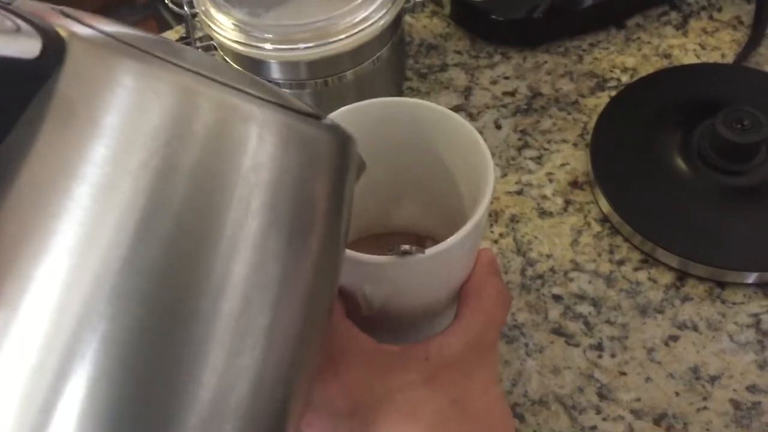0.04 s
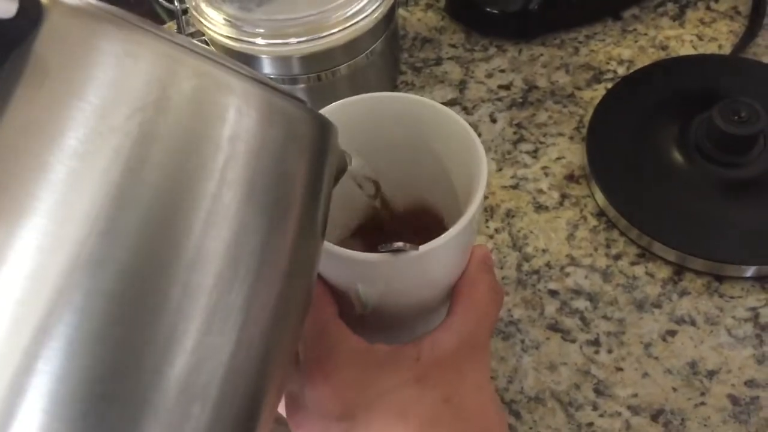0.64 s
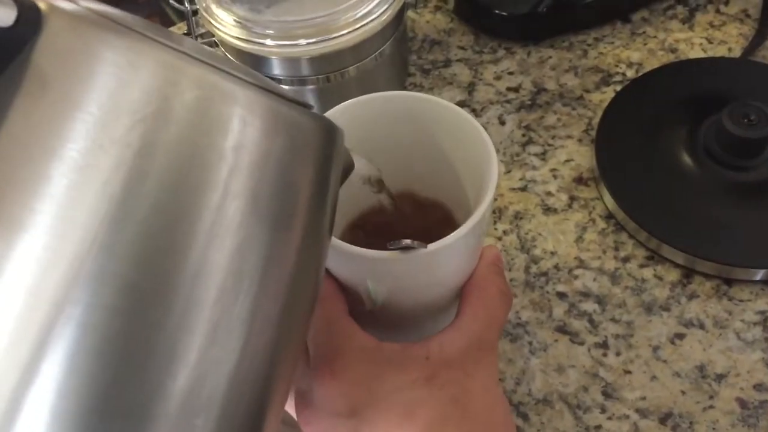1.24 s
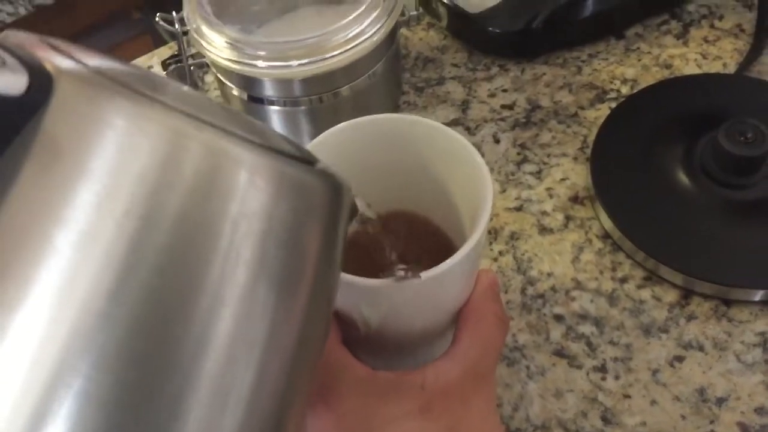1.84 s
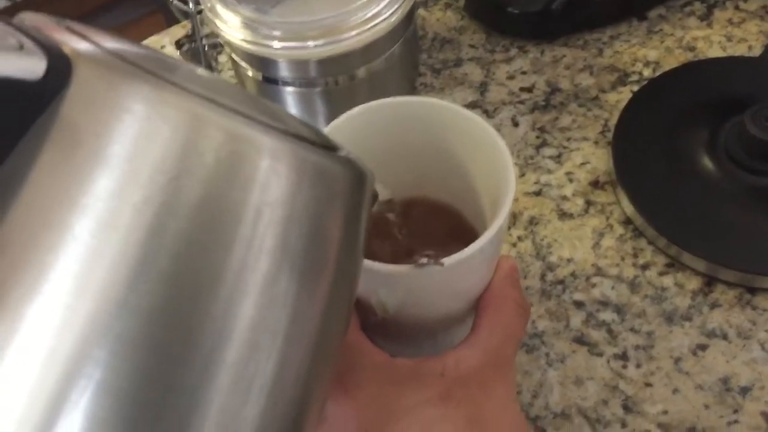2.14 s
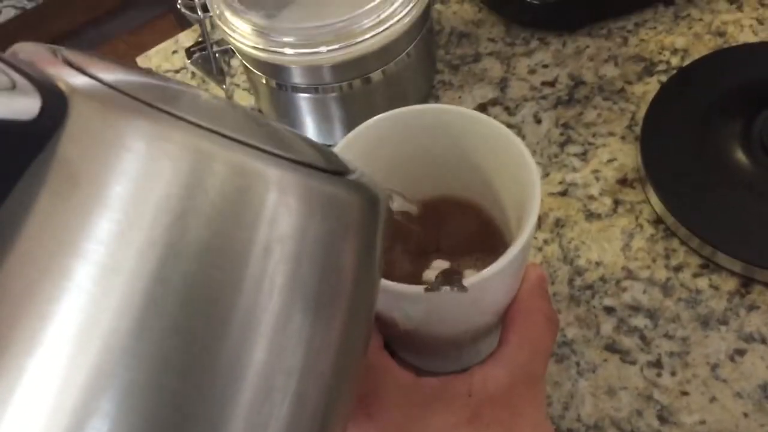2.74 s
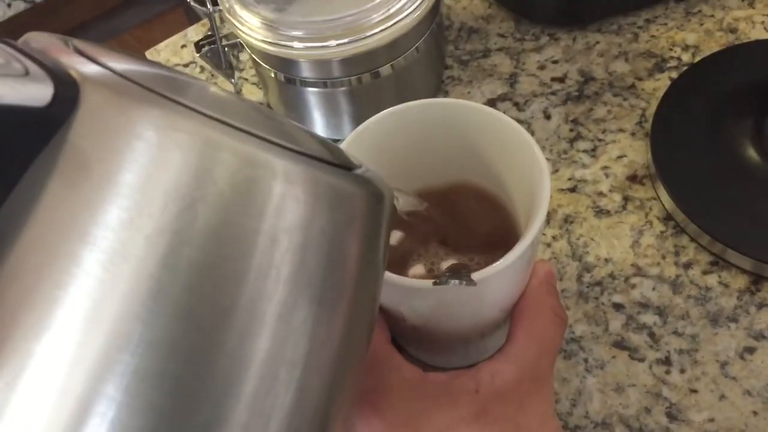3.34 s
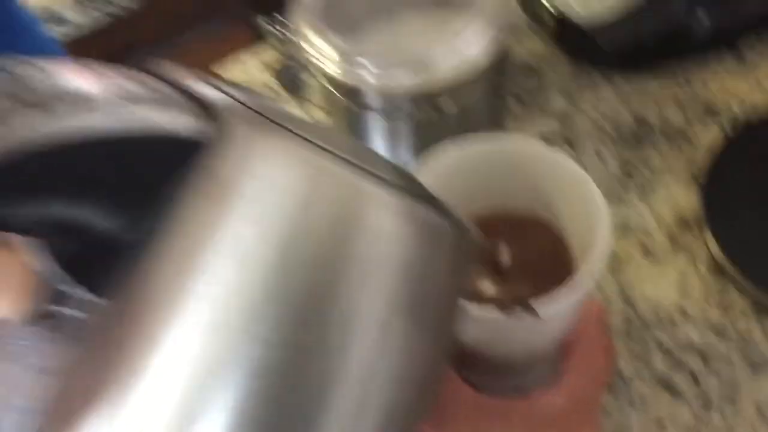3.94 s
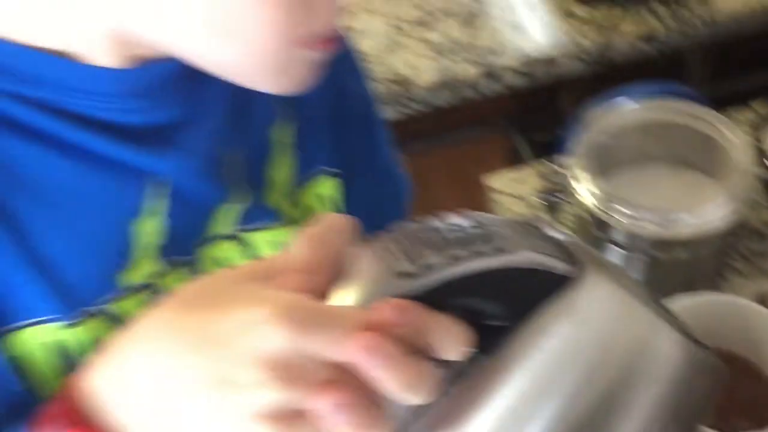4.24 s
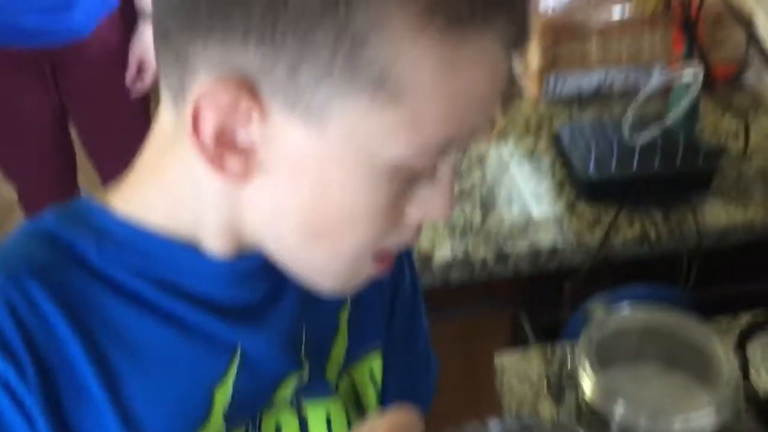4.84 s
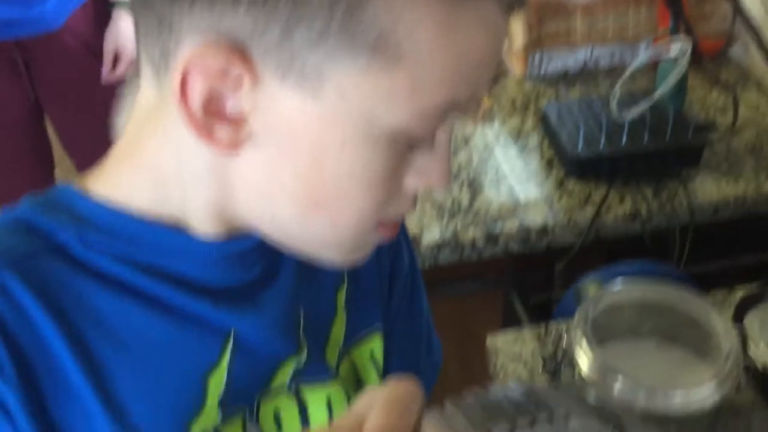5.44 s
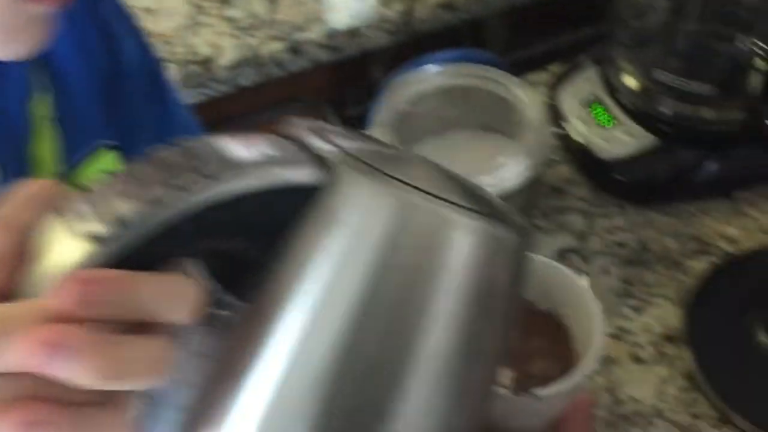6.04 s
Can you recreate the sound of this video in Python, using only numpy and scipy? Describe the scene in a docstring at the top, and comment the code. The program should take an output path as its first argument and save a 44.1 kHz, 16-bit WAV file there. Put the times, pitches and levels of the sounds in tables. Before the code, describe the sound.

Water pours thinly from a kettle into a mug as a small dog yips sharply across the kitchen, its tags clinking.

```python
"""A small dog yips four times in a hard-walled kitchen, each yip one push of effort that drives
harmonics and breath noise through its mouth. It whimpers faintly; its collar tags clash and ring.
Close by, a thin stream runs from a gulping, ticking kettle into a mug as splashes and bubbles.
Soft steps, scuffs and knocks on a rattling cabinet come from farther off.
Near the end a scuff catches in a stick-slip squeak."""
import sys
import numpy as np
from scipy import signal
from scipy.fft import rfft, irfft
from scipy.io import wavfile
from scipy.ndimage import uniform_filter1d

SR = 44100
rng = np.random.default_rng(int(sys.argv[2]) if len(sys.argv) > 2 else 0)


def persist_wave(psi):
    """Save psi, clipped to +-1, as 16-bit WAV."""
    counts = np.round(np.clip(psi, -1, 1) * 32767).astype(np.int16)
    wavfile.write(sys.argv[1], SR, np.atleast_2d(counts).T)


N = 268128
TIME = np.arange(N) / SR


def from_db(db):
    return 10 ** (np.asarray(db) / 20)


def unit_rms(x):
    return x / np.sqrt(np.mean(x ** 2) + 1e-20)


def at_hz(points, hz):
    """Interpolate a table over log frequency."""
    freq_hz, value = np.transpose(points)
    return np.interp(np.log(np.maximum(hz, 1)), np.log(freq_hz), value)


def colour(x, spectrum, tilt_db_per_oct=0):
    """Filter by a spectrum tilted about 1 kHz; rms 1."""
    hz = np.fft.rfftfreq(len(x), 1 / SR)
    gain_db = at_hz(spectrum, hz) + tilt_db_per_oct * np.log2(np.maximum(hz, 100) / 1000)
    return unit_rms(irfft(rfft(x) * from_db(gain_db), len(x)))


def wobble(count, rate_hz):
    """Low-passed noise, up to 0.5 s; rms 1."""
    lowpass = signal.butter(2, rate_hz, fs=SR, output="sos")
    return unit_rms(signal.sosfilt(lowpass, rng.standard_normal(SR))[SR // 2:][:count])


def add(track, start_s, sound):
    at = round(start_s * SR)
    track[at:at + len(sound)] += sound[:max(N - at, 0)]


def burst(spectrum, t60_s):
    """A struck body with crowded, quickly damped modes."""
    t = TIME[:SR // 3]
    return colour(rng.standard_normal(len(t)), spectrum) * from_db(-60 * t / t60_s)


def blows(rows, body):
    """Blows on one body; softer contact, lower top_hz."""
    out = np.zeros(N)
    for start_s, level_db, top_hz, t60_s in rows:
        contact = signal.butter(3, top_hz, fs=SR, output="sos")
        add(out, start_s, from_db(level_db) * signal.sosfilt(contact, burst(body, t60_s)))
    return out


def dying_run(start_s, level_db, top_hz, t60_s, gap_s, loss_db, count):
    """Rows of evenly spaced, weakening blows."""
    return [(start_s + k * gap_s, level_db - k * loss_db, top_hz, t60_s) for k in range(count)]


# Background spectrum: freq_hz, gain_db
AIR_SPECTRUM = [(30, -9.5), (53, 6.5), (90, -4.5), (130, 2.5), (200, -8), (300, -5.5), (363, -0.5),
                (450, -12), (1070, -16), (1840, -19.5), (3160, -18.5), (4900, -22), (10400, -26),
                (15000, -26)]
def room_air(level_db=-62.5):
    """The room's steady hum and hiss."""
    return from_db(level_db) * colour(rng.standard_normal(N), AIR_SPECTRUM)


def bubble(pitch_hz, t60_cycles=40):
    """A bubble rings, rising in pitch as it nears the surface."""
    t = TIME[:SR // 10]
    envelope = from_db(-60 * t * pitch_hz / t60_cycles) * (1 - np.exp(-t * pitch_hz))
    return envelope * np.sin(2 * np.pi * pitch_hz * t * (1 + t))


# Flow of the stream: time_s, level_db
POUR_FLOW = [(0, -54.5), (.9, -60), (1.7, -57.5), (2.2, -61.5), (3.2, -59), (3.9, -75.5), (4.3, -71.5),
             (6.08, -69)]
# Mug resonance: freq_hz, gain_db
MUG_SPECTRUM = [(300, -39), (750, -18.5), (1100, 5), (1600, -7.5), (3000, -7), (6000, -21), (15000, -28)]
def pour(splashes_per_s=700, bubble_count=260, bubble_hz=1080):
    """Tiny splashes and small bubbles in the mug, scaled by the flow."""
    sizes = from_db(1.5 * np.minimum(rng.exponential(1, N), 4)) * rng.choice([-1, 1], N)
    splashes = sizes * (rng.random(N) < splashes_per_s / SR)
    out = from_db(-4.5) * colour(splashes, MUG_SPECTRUM)
    starts_s = rng.uniform(0, TIME[-1], bubble_count)
    for start_s, spread in zip(starts_s, rng.normal(0, 0.19, bubble_count)):
        add(out, start_s, from_db(6) * bubble(bubble_hz * np.exp(spread)))
    return out * from_db(np.interp(TIME, *np.transpose(POUR_FLOW)))


# Tag contacts: start_s, level_db, tilt_db_per_oct
TAG_TOUCHES = [(0.0014, -41, 13), (0.3366, -41.5, 1), (0.6714, -31.5, 2), (0.9634, -39.5, 17),
               (1.7604, -53, -4), (2.1847, -54, -11.5), (2.9937, -41, -1), (3.3907, -37.5, 7),
               (3.705, -45.5, 4), (4.288, -41, 6), (5.0188, -37.5, -6.5), (5.1456, -39.5, 2),
               (5.2665, -41, 29), (5.3808, -25.5, 29), (5.748, -40, 14)]
# Tag ring: freq_hz, gain_db, t60_s
TAG_MODES = [(5970, -17, 0.45), (5830, -16.5, 0.47), (6500, -22, .1), (8400, -9, 0.13), (8060, -17, .2),
             (9100, -20.5, .15), (11220, -6.5, .3), (13930, -5, .18), (14080, 0.5, .2), (14380, -3, 0.17),
             (14620, -8, .11), (14870, -10, .14)]
# Contact noise: freq_hz, gain_db
CLASH_SPECTRUM = [(2000, -11), (4500, -11), (6000, 5.5), (7200, -8), (8300, 0.5), (10000, -14.5),
                  (13000, -7), (15000, -0.5)]
def collar_tags(slide_s=0.001, main_hz=14100, detune=0.0071, rebound_s=0.011, rebound_db=-8):
    """Tags slide into contact, clash, ring and rebound; leaning on each other detunes them."""
    out, t = np.zeros(N), TIME[:SR // 3]
    hz, mode_db, t60_s = np.transpose(TAG_MODES)[:, :, None]
    contact = 1 - np.exp(-t / slide_s)
    for start_s, level_db, tilt_db_per_oct in TAG_TOUCHES:
        envelopes = from_db(mode_db + tilt_db_per_oct * np.log2(hz / main_hz) - 60 * t / t60_s)
        for lag_s, drop_db in [(0, 0), (rebound_s * rng.uniform(0.61, 1.3), rebound_db)]:
            pressed_hz = hz * (1 + detune * rng.standard_normal(hz.shape))
            ring = from_db(-7) * (envelopes * np.sin(2 * np.pi * pressed_hz * t)).sum(0)
            clash = from_db(-3) * burst(CLASH_SPECTRUM, t60_s=0.08)
            add(out, start_s + lag_s, from_db(level_db + drop_db) * contact * (ring + clash))
    return out


# Weak bass of a small radiator: freq_hz, gain_db
BASS_ROLLOFF = [(300, -46), (750, -45), (1000, -17.5), (1200, -8.5)]
def cry(pitch_hz, level_db, roughness, spectrum, jitter_hz=420, fade_s=0.0022):
    """Filtered harmonics and air noise; roughness makes the cycles lurch and break into noise."""
    t = TIME[:len(pitch_hz)]
    pitch_hz = pitch_hz * (1 + 0.24 * roughness * np.tanh(wobble(len(t), jitter_hz) / 2))
    phase = 2 * np.pi * np.cumsum(pitch_hz) / SR
    slack_db = np.maximum.accumulate(level_db) - level_db   # upper harmonics fade first
    harmonics = np.zeros(len(t))
    for k in range(1, 13):
        gain = (k * pitch_hz < SR * 0.45) * from_db(-0.28 * slack_db * np.log2(k))
        harmonics += gain * np.sin(k * phase + rng.uniform(0, 2 * np.pi))
    shimmer = 1 + 0.96 * roughness * wobble(len(t), jitter_hz)
    hiss = from_db(-28 + 26 * roughness) * rng.standard_normal(SR // 2)[:len(t)]
    voice = colour(unit_rms(harmonics) * shimmer + hiss, list(BASS_ROLLOFF) + list(spectrum))
    local_rms = np.sqrt(uniform_filter1d(voice ** 2, size=300) + 1e-9)
    fade = np.clip(np.minimum(t, t[-1] - t) / fade_s, 0, 1)
    return voice / local_rms * from_db(level_db) * fade


# Yips (hold 1 = even fall of effort, higher = later fall):
# start_s, length_s, attack_s, rise_s, full_effort_hz, end_hz, hold, level_db, sag_db, roughness
YIPS = [(0.0503, .07, 0.0017, .022, 1822, 1284, .78, -11, 10, .09),
        (0.77, .066, 0.0017, .03, 1381, 1259, 2.06, -18, 5.8, 0.023),
        (2.417, .088, 0.014, .018, 1850, 1335, 1.0, -18, 1.87, 0.927),
        (4.635, 0.075, 0.0031, 0.0235, 1413, 1257, 1.15, -16, 8.1, 0.052)]
# Mouth resonances, one list per yip: freq_hz, gain_db
MOUTH_SPECTRA = [
    [(1400, -1.5), (1830, -4.5), (2100, -13), (2700, -4.5), (3500, -3), (3850, 1.5), (4400, -4), (5400, -2),
     (6500, -10), (8700, -10), (10300, -27.5), (15000, -16.5)],
    [(1400, -3), (1950, -16), (2800, -9), (3450, -10), (4200, -7.5), (5500, -6), (6300, -25), (7000, -17),
     (8400, -12), (10300, -32.5), (15000, -24.5)],
    [(1400, 0), (2030, 0.5), (2300, -20), (2750, -4.5), (4000, -0.5), (5900, -3), (6400, -15.5), (8300, -8),
     (10300, -28), (15000, -21.5)],
    [(1400, -12), (2800, -5), (4200, 0), (5600, -11.5), (6300, -31), (7000, -23), (8400, -21), (10300, -38),
     (15000, -36)],
]
def dog_yips(start_hz=1425.5, onset_db=-1.5, release_s=0.0029, rest_share=0.41):
    """One push of effort per yip, quick up and slower down, steers pitch, level and roughness."""
    out = np.zeros(N)
    for (start_s, length_s, *shape), mouth in zip(YIPS, MOUTH_SPECTRA):
        attack_s, rise_s, full_effort_hz, end_hz, hold, level_db, sag_db, roughness = shape
        t = TIME[:int(length_s * SR)]
        rising = t < rise_s
        spent = np.clip((t - rise_s) / (length_s - rise_s), 0, 1)
        effort = np.where(rising, (t / rise_s) ** 0.8, 1 - spent ** hold)
        pitch_hz = effort * full_effort_hz + (1 - effort) * np.where(rising, start_hz, end_hz)
        envelope_db = level_db + (1 - effort) * np.where(rising, onset_db, -sag_db)
        rasp = roughness * (rest_share + (1 - rest_share) * effort)
        throat = np.clip(np.minimum(t / attack_s, (length_s - t) / release_s), 0, 1)
        add(out, start_s, throat * cry(pitch_hz, envelope_db, rasp, mouth))
    return out


def droplets(count=40, until_s=3.4, centre_hz=3200):
    """Stray drops trap tiny, high bubbles."""
    out = np.zeros(N)
    starts_s = rng.uniform(0, until_s, count)
    levels_db = rng.normal(-51, 3, count)
    pitches_hz = centre_hz * 2 ** rng.normal(0, 0.18, count)
    for start_s, level_db, pitch_hz in zip(starts_s, levels_db, pitches_hz):
        add(out, start_s, from_db(level_db) * bubble(pitch_hz))
    return out


# Soft, hollow steps: start_s, level_db, centre_hz
STEPS = [(0.383, -44.5, 640), (3.58, -46, 582), (4.248, -44.5, 678), (5.339, -38, 717), (5.849, -45.5, 736)]
def steps(rise_s=0.0032):
    """A padded contact swells in one broad resonance."""
    out = np.zeros(N)
    for start_s, level_db, hz in STEPS:
        bump = burst([(hz / 2, -18), (hz, 0), (hz * 2, -35), (hz * 10, -54)], t60_s=0.11)
        swell = 1 - np.exp(-TIME[:len(bump)] / rise_s)
        add(out, start_s, from_db(level_db) * bump * swell)
    return out


# Kettle ticks: start_s, level_db, centre_hz
KETTLE_TICKS = [(0.441, -45, 7450), (.552, -31.5, 4300), (1.113, -39.5, 3450), (1.518, -47, 12600),
                (1.635, -49, 12600), (4.07, -48, 1800), (4.474, -48.5, 3100)]
def kettle_ticks(gain_db=-6):
    """Each tick is one broad, quickly damped resonance."""
    out = np.zeros(N)
    for start_s, level_db, hz in KETTLE_TICKS:
        tick = burst([(hz / 4, -20), (hz, 0), (hz * 2, -20)], t60_s=0.028)
        add(out, start_s, from_db(level_db + gain_db) * tick)
    return out


# Gulps: start_s, level_db, top_hz, loss_db (per slosh)
KETTLE_GULPS = [(0.6061, -25.5, 2550, 8), (0.84, -33, 1330, 16), (4.831, -42, 740, 14)]
# Kettle body: freq_hz, gain_db
KETTLE_SPECTRUM = [(90, -34.5), (150, -1.5), (200, 3.5), (330, 0.5), (450, -3), (700, 6), (1100, 4),
                   (1900, -2.5), (2550, -1), (3100, -26), (8000, -37.5)]
def kettle_gulps():
    """Air enters the kettle and the water slaps its wall."""
    sloshes = []
    for start_s, level_db, top_hz, loss_db in KETTLE_GULPS:
        sloshes += dying_run(start_s, level_db, top_hz, t60_s=0.074, gap_s=0.027, loss_db=loss_db, count=4)
    return blows(sloshes, KETTLE_SPECTRUM)


# Prominent bubbles: start_s, level_db, pitch_hz
MUG_PLIPS = [(0.971, -39, 995), (1.032, -39, 930), (1.392, -42.5, 947), (1.436, -41.5, 1070),
             (1.52, -44.5, 1070), (1.617, -44, 1054), (2.1, -43, 1090), (2.181, -46.5, 1160),
             (3.914, -48.5, 1113), (1.1518, -36.5, 3130), (3.929, -39, 3050), (2.119, -56.5, 439)]
def plips(gain_db=3):
    """Single bubbles ring out above the trickle."""
    out = np.zeros(N)
    for start_s, level_db, pitch_hz in MUG_PLIPS:
        add(out, start_s, from_db(level_db + gain_db) * bubble(pitch_hz))
    return out


# Whimpers: start_s, length_s, start_hz, end_hz, level_db
DOG_WHIMPERS = [(1.185, 0.11, 2050, 2064, -58.5), (1.197, 0.1, 2347, 2510, -54.5),
                (2.308, 0.11, 975, 895, -51.5)]
def dog_whimpers():
    """Faint, gliding pure tones."""
    out = np.zeros(N)
    for start_s, length_s, start_hz, end_hz, level_db in DOG_WHIMPERS:
        pitch_hz = np.linspace(start_hz, end_hz, int(length_s * SR))
        tone = np.sin(2 * np.pi * np.cumsum(pitch_hz) / SR)
        add(out, start_s, from_db(level_db) * tone * signal.windows.tukey(len(tone)))
    return out


# Floor scuffs: start_s, length_s, level_db, tilt_db_per_oct
FLOOR_SCUFFS = [(1.779, 0.041, -44, -4), (3.415, 0.11, -48, 6), (5.52, .17, -42.5, 12)]
# Friction noise: freq_hz, gain_db
SCUFF_SPECTRUM = [(500, -12), (1400, 18), (3000, 9.5), (5500, -3), (9000, -6), (12500, -13), (16000, -18)]
def scuffs():
    """Soft swells of friction on the floor."""
    out = np.zeros(N)
    for start_s, length_s, level_db, tilt_db_per_oct in FLOOR_SCUFFS:
        swell = signal.windows.tukey(int(length_s * SR), 0.8)
        friction = colour(rng.standard_normal(SR // 2), SCUFF_SPECTRUM, tilt_db_per_oct)
        add(out, start_s, from_db(level_db) * swell * friction[:len(swell)])
    return out


# Knocks: start_s, level_db, top_hz, t60_s, rattle_db, thump_db
CABINET_KNOCKS = [(2.889, -30, 3000, 0.29, -38.5, -34), (3.006, -23.5, 1420, 0.12, -32, -63),
                  (3.182, -30, 1280, 0.057, -41, -46.5), (3.268, -37.5, 1800, 0.12, -47.5, -50.5)]
# Cabinet body: freq_hz, gain_db
CABINET_SPECTRUM = [(50, -4.5), (145, -39), (240, -28), (440, -24), (590, 3), (730, -3.5), (880, -16.5),
                    (1200, -6.5), (1600, -10.5), (2400, -10), (4000, -11), (9000, -11.5)]
# Floorboards: freq_hz, gain_db
FLOOR_SPECTRUM = [(25, -23), (55, -5), (85, -17), (135, 5), (215, -14), (500, -12), (3000, -65)]
def cabinet_knocks(gap_s=0.027):
    """Each knock sets the door chattering and thumps the floor."""
    door, floor = [], []
    for start_s, level_db, top_hz, t60_s, rattle_db, thump_db in CABINET_KNOCKS:
        door.append((start_s, level_db, top_hz, t60_s))
        door += dying_run(start_s + gap_s, rattle_db, top_hz=2407, t60_s=0.18,
                          gap_s=gap_s, loss_db=9.5, count=3)
        floor.append((start_s, thump_db, 400, 0.16))   # top_hz, t60_s
    return blows(door, CABINET_SPECTRUM) + blows(floor, FLOOR_SPECTRUM)


# Squeak resonance: freq_hz, gain_db
SQUEAK_SPECTRUM = [(1400, -20), (2600, 5.5), (3600, 13), (5300, -23), (15000, -38)]
def squeak(start_s=5.581, length_s=0.305, catch_hz=3200, settled_hz=2560, settle_s=0.024,
           rise_s=0.054, fall_db_per_s=132):
    """The last scuff catches; its rasp settles into a thin stick-slip tone."""
    out, t = np.zeros(N), TIME[:int(length_s * SR)]
    pitch_hz = settled_hz + (catch_hz - settled_hz) * np.exp(-(t / settle_s) ** 2)
    slipping = np.maximum(1 - t / rise_s, 0)
    level_db = -35 - 21 * slipping - fall_db_per_s * np.maximum(t - rise_s, 0)
    roughness = 0.28 + 0.78 * slipping
    add(out, start_s, cry(pitch_hz, level_db, roughness, SQUEAK_SPECTRUM))
    return out


# Floor and cupboard reflections: delay_s, gain_db
EARLY_ECHOES = [(.0043, -7), (.0091, -6), (0.014, -5.5)]
def with_echoes(x):
    """Early echoes beat against a gliding pitch, so harmonics swell and dip."""
    out = x.copy()
    for delay_s, gain_db in EARLY_ECHOES:
        add(out, delay_s, from_db(gain_db) * x)
    return out


# Kitchen reverberation: freq_hz, t60_s
ROOM_DECAY = [(150, .4), (1000, 0.59), (2600, 0.58), (7000, 0.48), (15000, 0.16)]
def room_response(build_s=0.016):
    """Dense reflections build up, then die soonest in the high treble; energy 1."""
    t, hz, edges_hz = TIME[:SR], np.arange(SR // 2 + 1), np.geomspace(40, 20000, 19)
    white, tail = rfft(rng.standard_normal(SR)), np.zeros(SR)
    for low_hz, high_hz in zip(edges_hz, edges_hz[1:]):
        band = irfft(white * ((hz >= low_hz) & (hz < high_hz)), SR)
        tail += band * from_db(-60 * t / at_hz(ROOM_DECAY, np.sqrt(low_hz * high_hz)))
    swell = 1 - np.exp(-(t / build_s) ** 2)
    spectrum = rfft(tail * swell)
    # a diffuse room favours no pitch
    spectrum /= np.sqrt(uniform_filter1d(np.abs(spectrum) ** 2, size=60) + 1e-6)
    tail = (irfft(spectrum, SR) * swell)[:SR * 3 // 4]
    return tail / np.sqrt(np.sum(tail ** 2))


def scene():
    """Dog, knocks and steps across the room; kettle, mug and squeak close and nearly dry."""
    room = room_response()

    def reverb(x, wet_db):
        return from_db(wet_db) * signal.fftconvolve(x, room)[:N]

    def placed(x, gain_db, wet_db):
        return from_db(gain_db) * (x + reverb(x, wet_db))

    voice = dog_yips() + dog_whimpers()
    dog = from_db(-4.5) * with_echoes(voice) + reverb(voice, wet_db=-5.5)
    collar = placed(collar_tags(), gain_db=-4, wet_db=0)
    knocks = placed(cabinet_knocks(), gain_db=-2, wet_db=-5)
    feet = placed(scuffs() + steps(), gain_db=-2, wet_db=-3)
    pouring = pour() + plips() + kettle_ticks() + droplets() + kettle_gulps()
    near = placed(pouring + squeak(), gain_db=0, wet_db=-13)
    return (dog + collar + knocks + feet + near + room_air())[None]


def record(dry):
    """42 Hz high-pass, soft clip, 15.9 kHz low-pass."""
    highpass = signal.butter(4, 42, "high", fs=SR, output="sos")
    lowpass = signal.ellip(10, 0.2, 80, 15900, fs=SR, output="sos")
    rounded = 0.9 * np.tanh(signal.sosfilt(highpass, dry) / 0.9)
    return signal.sosfilt(lowpass, rounded)


dry = scene()
out = record(dry)
persist_wave(out)
```